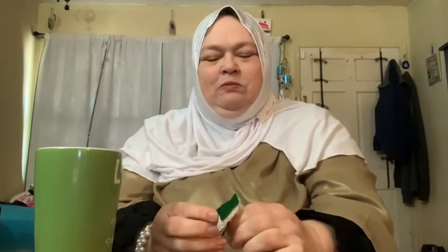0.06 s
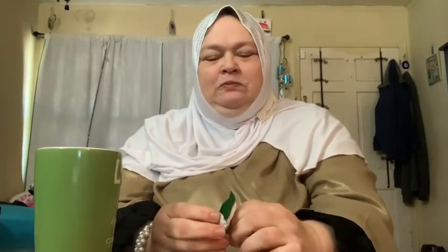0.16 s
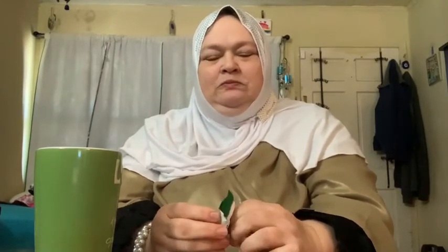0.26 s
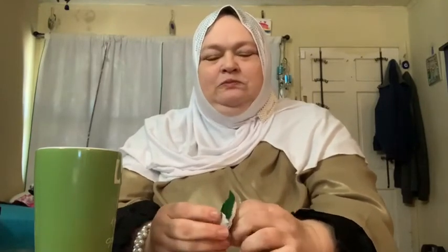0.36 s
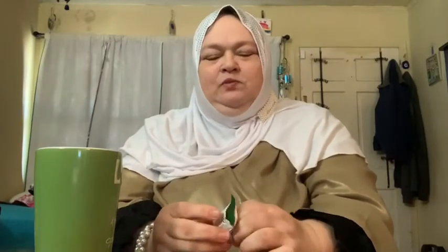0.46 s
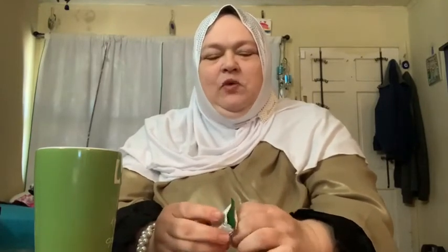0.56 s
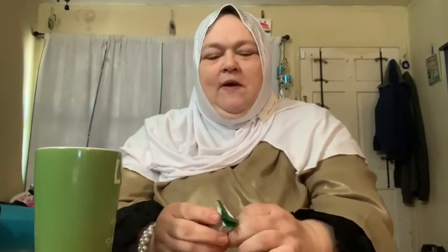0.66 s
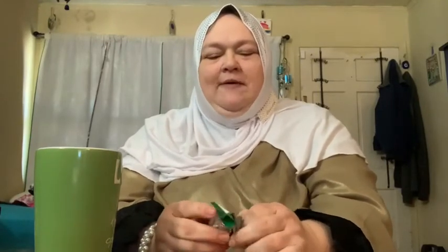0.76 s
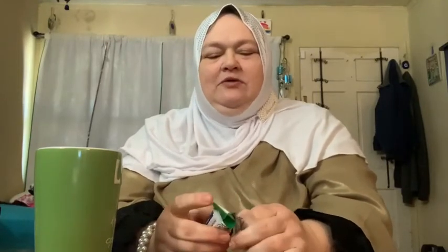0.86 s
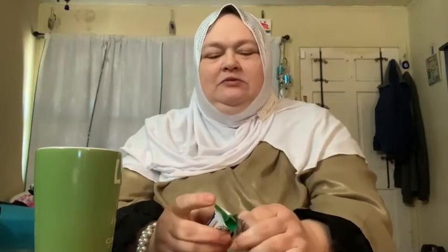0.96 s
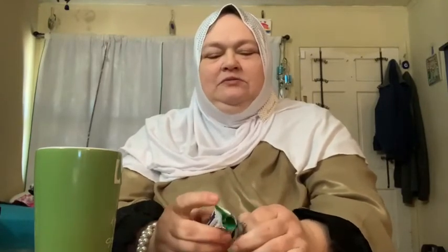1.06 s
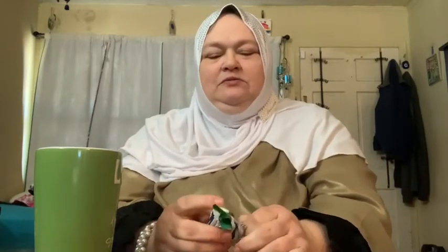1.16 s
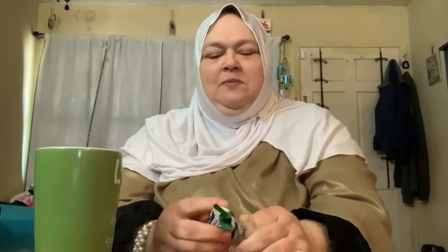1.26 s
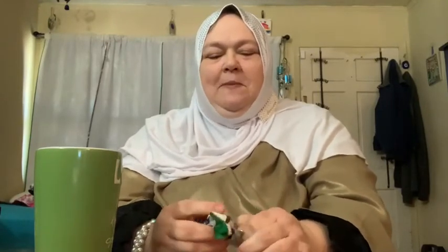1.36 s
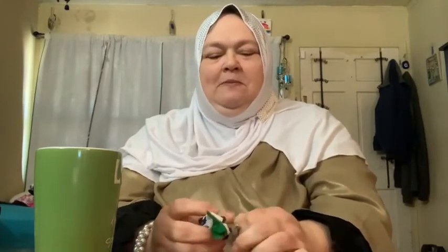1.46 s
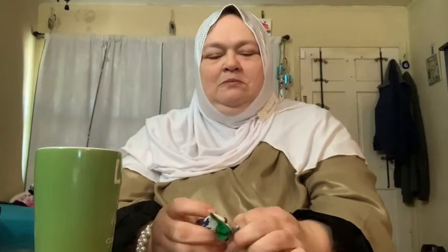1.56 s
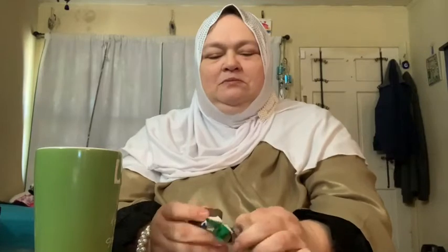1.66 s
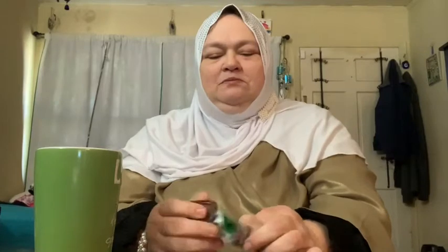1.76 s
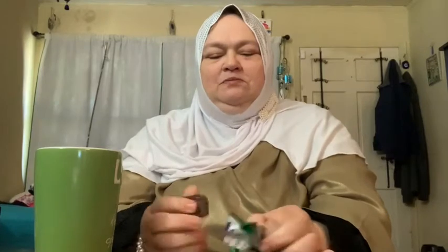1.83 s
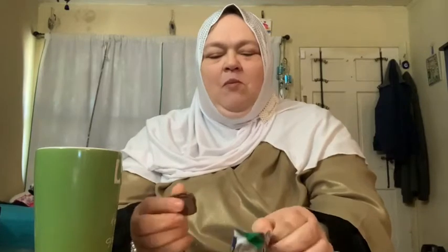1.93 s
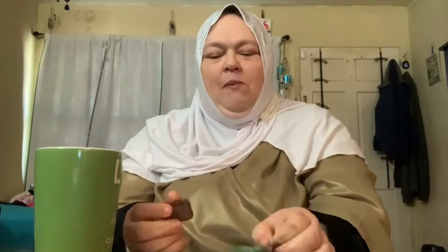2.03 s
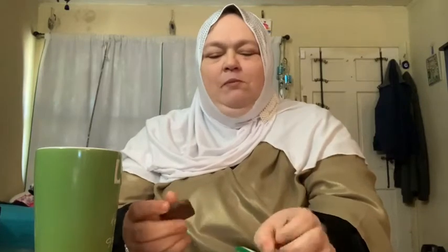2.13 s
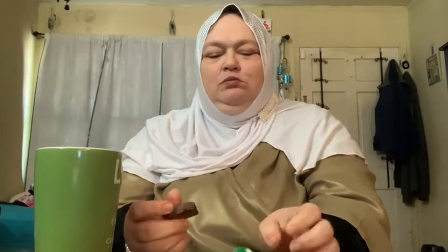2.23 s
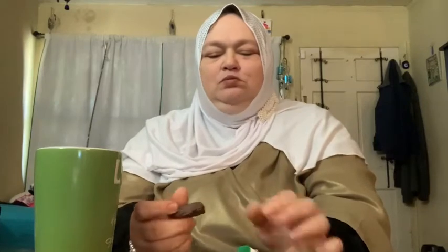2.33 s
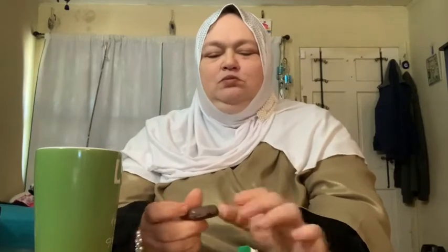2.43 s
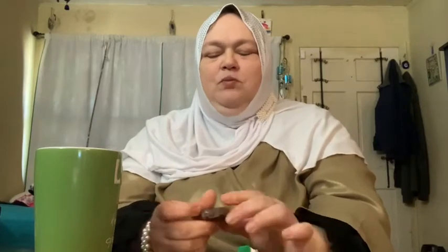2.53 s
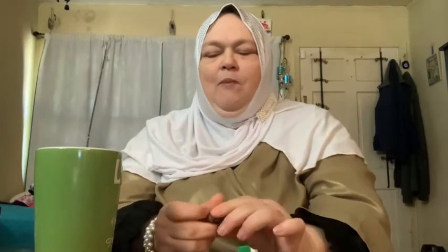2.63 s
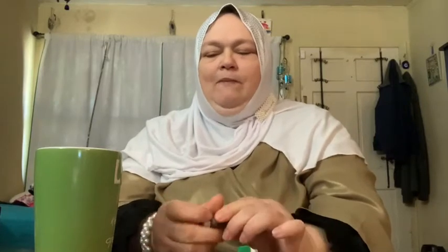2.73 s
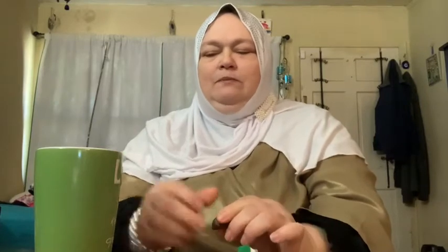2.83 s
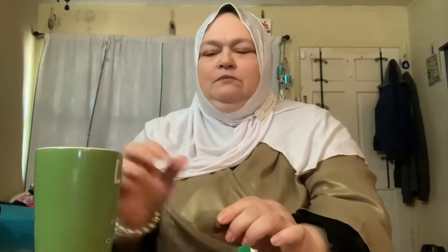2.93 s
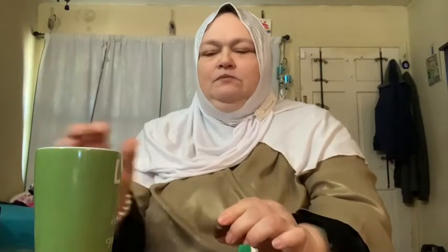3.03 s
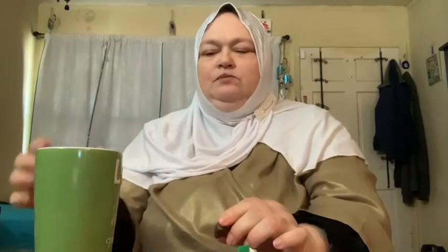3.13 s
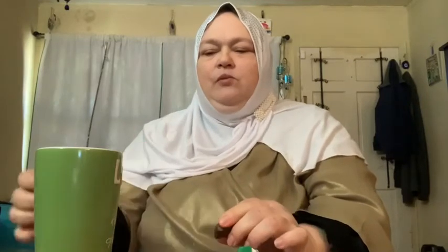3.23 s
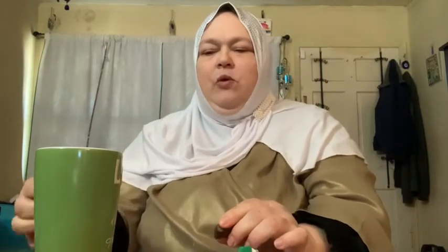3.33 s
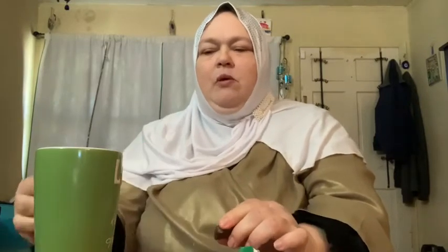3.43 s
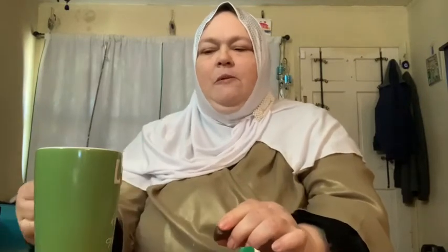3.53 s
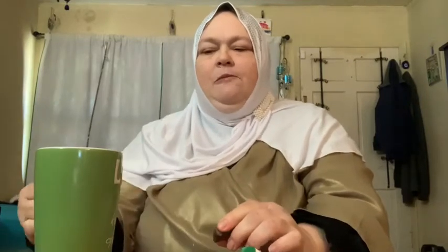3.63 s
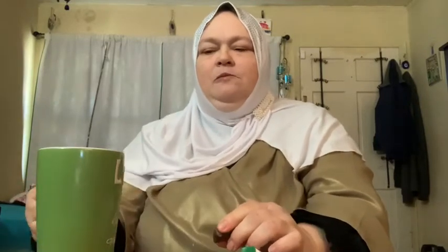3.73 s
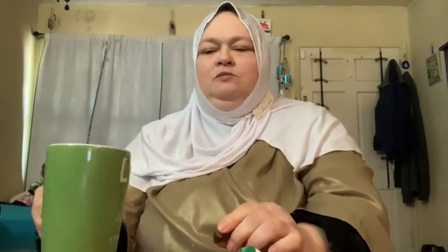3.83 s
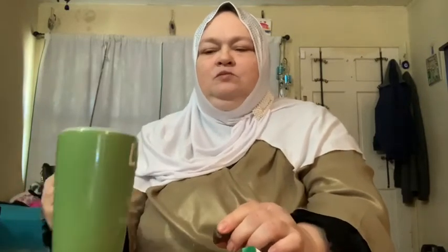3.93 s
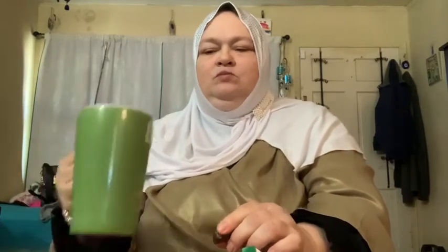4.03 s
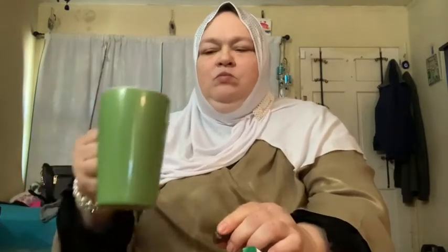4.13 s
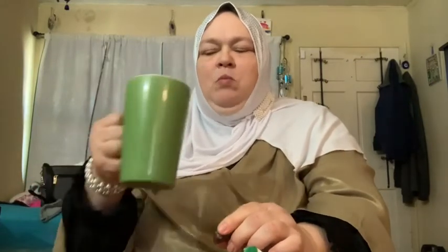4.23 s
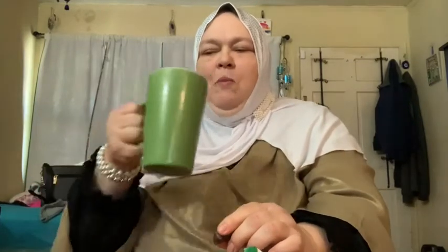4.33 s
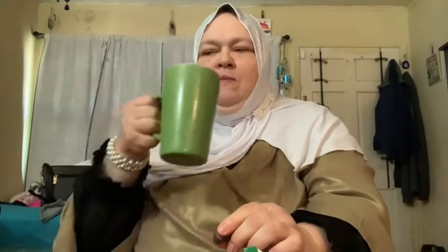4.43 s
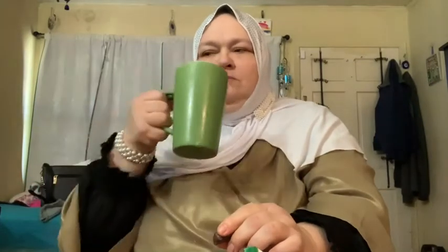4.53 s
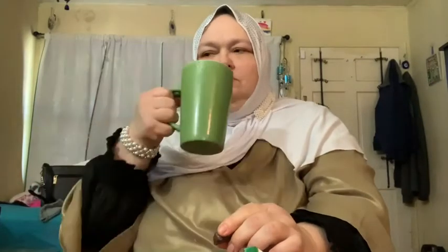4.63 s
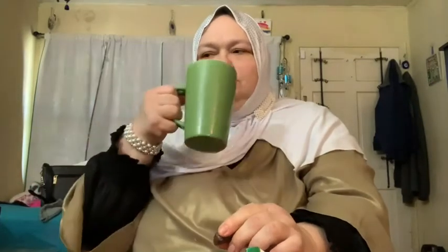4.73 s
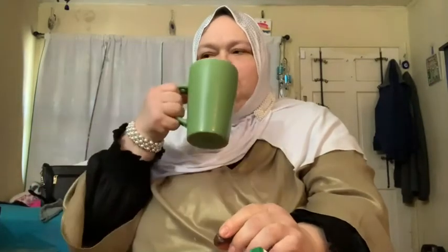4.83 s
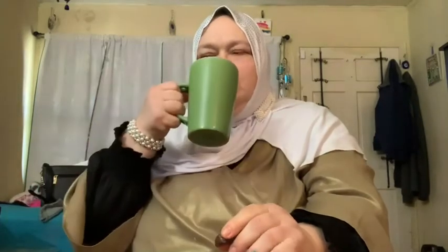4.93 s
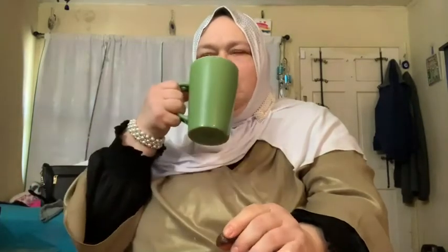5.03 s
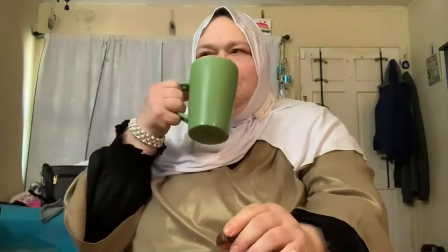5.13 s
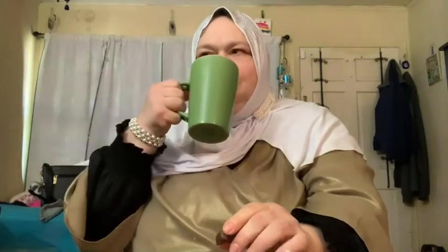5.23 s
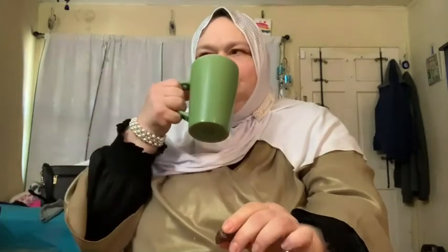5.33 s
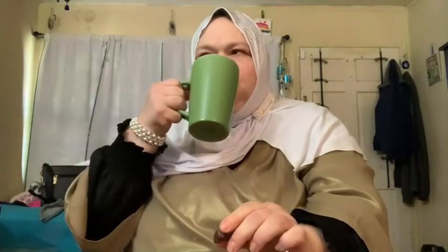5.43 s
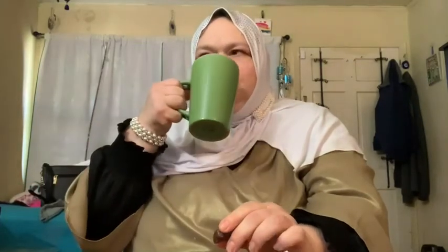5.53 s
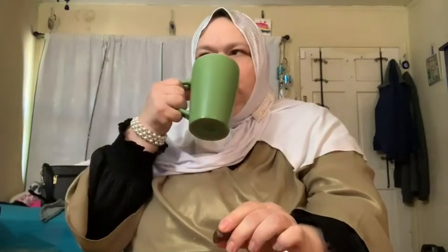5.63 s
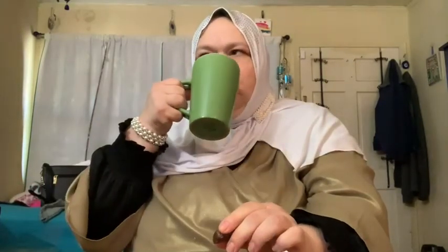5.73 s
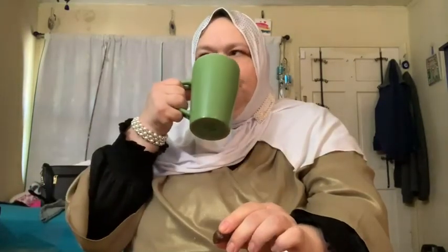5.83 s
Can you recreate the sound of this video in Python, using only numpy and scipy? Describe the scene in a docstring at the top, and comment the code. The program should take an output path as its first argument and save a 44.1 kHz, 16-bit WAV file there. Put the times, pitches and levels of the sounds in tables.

```python
"""Candy wrapper, mug and sip

A stiff plastic candy wrapper is pulled open by hand, close to a two-port microphone in a bedroom: creases
snap (millisecond noise bursts with ringing facets) over a fine crackle (swarms of tiny clicks) that thins
out to a few ticks. A mug is taken from the table with a dull knock (swelling sines) and a short ring; a soft,
fizzy sip follows (clicks again). The room adds early echoes, a short tail, a low rumble and a faint hum."""
import sys
import numpy as np
from scipy import signal
from scipy.fft import rfft, irfft
from scipy.io import wavfile

SR = 44100
rng = np.random.default_rng(int(sys.argv[2]) if len(sys.argv) > 2 else 0)


def store_wav(level_fs):
    """Save 16-bit WAV to argv[1]."""
    pcm = np.round(np.clip(np.atleast_2d(level_fs), -1, 1) * 32767)
    wavfile.write(sys.argv[1], SR, pcm.T.astype(np.int16))


N = 259683

# squeezes or pulls of the fingers on the film: (t/s, hold/s, relative crackle level/dB, hollow share/dB)
SQUEEZES = [(0, 0.0327, -42, -14.5), (.09, 0.1076, -55.5, -19.5), (.21, .14, -50, -13.5),
            (.513, 0.0112, -27, -13.5), (.535, 0.0226, -37.5, -7.5), (.632, 0.0186, -37.5, -9),
            (.78, 0.019, -44.5, -13.5), (.89, 0.0366, -48.5, -20), (.957, 0.0248, -37, -6),
            (1.029, 0.0215, -40, -1), (1.09, 0.054, -50.5, -10.5), (1.258, 0.0344, -42.5, -4.5),
            (1.3, 0.0686, -47.5, -2), (1.412, .12, -48, -7.5), (1.55, 0.033, -35, -6.5),
            (1.65, 0.0567, -41, -4), (1.74, 0.0814, -60, 0.5), (1.98, 0.1238, -53.5, -5),
            (2.165, 0.046, -60, -15)]
# dull knocks on the table: (t/s, f/Hz, peak level/dB, swell time/s)
KNOCKS = [(1.768, 236, -54.5, 0.0098), (1.82, 228, -46.5, 0.01), (2.04, 224, -54.5, 0.0112),
          (2.198, 227.2, -56, 0.0074), (3.6574, 217, -25.5, 0.01164), (3.699, 196.5, -40, 0.0249)]
# span over which a click's level is counted
LEVEL_S = .002


def undb(db):
    """Decibels to gain."""
    return 10 ** (np.asarray(db) / 20)


def unit(x):
    """Scale to rms 1."""
    return x / np.sqrt(np.mean(x ** 2))


def band(x, lo_hz, hi_hz, order=2):
    """Causal band-pass along the last axis."""
    edges_hz = [max(lo_hz, 20), min(hi_hz, .45 * SR)]
    sos = signal.butter(order, edges_hz, "band", fs=SR, output="sos")
    return signal.sosfilt(sos, x)


def colour(x, points):
    """Shape a sound by (f/Hz, level/dB) points, joined on a log frequency axis."""
    hz, db = np.transpose(points)
    f = np.maximum(np.fft.rfftfreq(x.shape[-1], 1 / SR), 1)
    gain = undb(np.interp(np.log(f), np.log(hz), db))
    return irfft(rfft(x) * gain, x.shape[-1])


def add(out, s, sound):
    """Mix a short sound in at time s."""
    i = max(int(s * SR), 0)
    n = max(min(sound.shape[-1], N - i), 0)
    out[:, i:i + n] += sound[..., :n]


def clicks(rows, rise_s, lag_s=.000088, lag_spread_s=.00001):
    """Each row buckles once: a short burst in three registers; a facet of its own size rings in each."""
    # registers of a click: (low edge f/Hz, high edge f/Hz, decay/s, gain/dB,
    #                        ring amplitude of the facet [ratio], part that differs between the ports [ratio])
    registers = [(7360, 15000, 0.00019, 0.06, 0.159, 0.24), (1950, 7310, .00042, 2.5, 0.2, 0.7),
                 (977, 1650, .00055, 1.06, 0.22, 0.16)]
    click_samples = 384
    rows, out = np.asarray(rows), np.zeros((2, N))
    t, f = np.arange(click_samples) / SR, np.fft.rfftfreq(click_samples, 1 / SR)
    chance = rng.standard_normal((len(rows), 3, 3, click_samples))
    facet = rng.random((len(rows), 3, 1, 1))
    lag = lag_s + lag_spread_s * rng.standard_normal((len(rows), 1))
    # the fold gives way gradually, then all at once
    onset = 1 - np.exp(-(t / rise_s) ** 2)
    sound = 0
    for k, (lo, hi, decay, gain_db, ring, apart) in enumerate(registers):
        # the facets radiate unevenly, so each port gets a part of its own
        push = chance[:, k, :1] + apart * chance[:, k, 1:]
        facet_hz = lo * (hi / lo) ** facet[:, k]
        mode = ring * np.sin(2 * np.pi * facet_hz * t) * np.exp(-t / (2 * decay))
        burst = band((push * np.exp(-t / decay) + mode) * onset, lo, hi, order=3)
        energy = np.sum(burst ** 2, axis=(1, 2), keepdims=True)
        rms = np.sqrt(energy / (2 * LEVEL_S * SR))
        sound = sound + burst / rms * undb(rows[:, k + 1] + gain_db)[:, None, None]
    # the left port is the farther one
    delay = np.exp(-2j * np.pi * f * np.maximum(lag, 0))
    sound[:, 0] = irfft(rfft(sound[:, 0]) * delay)
    for s, click in zip(rows[:, 0], sound):
        add(out, s - rise_s, click)
    return out


def crackle(strokes, attack_s, release_s, per_second, scatter_db, middle_db):
    """A swarm of tiny clicks of uneven size; with each stroke it swells, holds and lets go."""
    start, hold, level_db, hollow_db = np.transpose(strokes)[:, :, None]
    count = int(per_second * (start.max() - start.min() + .4))
    chance = rng.random((count, 4))
    first_s = max(start.min() - 4 * attack_s, 0)
    when = first_s + (np.arange(count) + 2 * chance[:, 0]) / per_second
    swell = np.minimum(when - start, 0) / attack_s
    letting_go = np.maximum(when - start - hold, 0) / release_s
    effort = np.exp(swell - letting_go)
    # the strongest stroke of the moment sets level and hollowness
    stroke_db = level_db + 20 * np.log10(effort + 1e-9)
    hollowness = hollow_db[stroke_db.argmax(axis=0), 0]
    # many faint ones, few strong ones
    size = unit(undb(-scatter_db * np.log(.03 + .97 * chance[:, 1])))
    # a denser swarm has weaker clicks
    db = stroke_db.max(axis=0) + 20 * np.log10(size) - 10 * np.log10(per_second * LEVEL_S)
    middle = db + middle_db + 8 * (chance[:, 2] - .5)
    hollow = db + hollowness + 10 * (chance[:, 3] - .5)
    return clicks(np.column_stack([when, db, middle, hollow]), rise_s=.0001)


def wrapper():
    """Strong creases snap through over the crackle of the film under the fingers."""
    # strongest creases: (t/s, relative treble level/dB, relative middle level/dB, relative hollow level/dB)
    snaps = [(.0435, -36.5, -44.5, -62.5), (.0762, -38, -41.5, -57), (.1213, -26.5, -35.5, -55),
             (.1682, -38, -46, -65.5), (.1895, -49.5, -52.5, -48), (.222, -32, -38.5, -51),
             (.2734, -45.5, -39.5, -53), (.3689, -41, -37, -51), (.3829, -20.5, -35, -58.5),
             (.4599, -34.5, -49.5, -69.5), (.4908, -40.5, -52.5, -70), (.5098, -25, -31, -43.5),
             (.5145, -18.5, -28.5, -38), (.5226, -35, -37, -32.5), (.5407, -34, -32.5, -40.5),
             (.5517, -31, -36, -37.5), (.5667, -33, -34.5, -45), (.6056, -38, -41, -46),
             (.6367, -33.5, -40.5, -47), (.6489, -24, -34.5, -40), (.6794, -33.5, -35.5, -55.5),
             (.7637, -36, -49.5, -65), (.7741, -28, -38.5, -48.5), (.781, -29, -28.5, -35.5),
             (.8753, -39, -41, -52.5), (.9011, -31, -37, -47), (.9408, -29.5, -31, -34.5),
             (.9617, -27.5, -30.5, -42.5), (.9737, -22, -31, -44.5), (.9808, -26, -33.5, -43.5),
             (.9876, -26, -39.5, -55), (1.0357, -29.5, -34, -35.5), (1.0481, -21.5, -32, -39),
             (1.0596, -29.5, -42, -44.5), (1.088, -18.5, -29, -29.5), (1.2561, -27, -31.5, -32),
             (1.2772, -28, -35, -37.5), (1.3087, -38.5, -38.5, -39.5), (1.3414, -36, -39, -61),
             (1.352, -42, -38.5, -41), (1.4084, -36, -33, -39), (1.4751, -43, -35, -48),
             (1.5536, -27.5, -28, -49.5), (1.5705, -30, -39.5, -41.5), (1.5868, -29.5, -33, -37.5),
             (1.628, -30, -33, -39), (1.6825, -31, -33, -37.5), (1.7016, -42.5, -41, -36.5),
             (1.7431, -35.5, -45, -59), (1.7785, -52.5, -46, -39), (1.9135, -43, -47, -67.5),
             (1.9776, -44.5, -48, -52), (2.0206, -34.5, -39.5, -43), (2.0321, -51.5, -46, -44),
             (2.0908, -63, -44, -49.5), (2.163, -45.5, -43.5, -44.5), (2.3831, -60, -67, -78.5),
             (2.5525, -39, -42.5, -46.5), (2.6801, -39, -42, -41)]
    # attack and release are time constants of the grip
    film = crackle(SQUEEZES, attack_s=.007, release_s=.013, per_second=220, scatter_db=5.0, middle_db=-3.5)
    return undb(-1.5) * clicks(snaps, rise_s=.0003) + undb(-4.0) * film


def sip():
    """Liquid drawn over the rim fizzes as a dense swarm of clicks; single droplets burst."""
    # bursting droplets: (t/s, relative treble level/dB, relative middle level/dB, relative hollow level/dB)
    pops = [(4.7789, -51.5, -52, -61.5), (4.8715, -49, -55, -45.5), (4.921, -46.5, -53, -59),
            (5.13, -59, -64, -67), (5.2013, -77.5, -66, -62)]
    # pulls of liquid over the rim: (t/s, hold/s, relative level/dB, hollow share/dB)
    draws = [(4.728, 0.0316, -66, -3.5), (4.77, 0.0416, -64.5, 0), (4.853, 0.0248, -57.5, -1),
             (4.91, 0.0178, -61.5, 2.5), (4.95, 0.114, -71, -8.5), (5.095, 0.049, -71.5, -3)]
    # attack and release are time constants of the suction
    fizz = crackle(draws, attack_s=0.0073, release_s=0.0359, per_second=600, scatter_db=3.5, middle_db=3.0)
    return undb(-1) * clicks(pops, rise_s=0.00015) + undb(-2.5) * fizz


def ticks():
    """Small, slow-rising clicks while the mug is fetched and after."""
    # (t/s, relative treble level/dB, relative middle level/dB, relative hollow level/dB)
    small_clicks = [(2.8816, -64.5, -54, -62), (3.0231, -62.5, -54, -60), (3.2166, -58.5, -65, -69.5),
                    (3.243, -70, -61.5, -79.5), (3.3285, -67, -77, -81.5), (3.7874, -61.5, -58.5, -65.5),
                    (3.9397, -50.5, -45.5, -43.5), (4.0558, -67, -64, -76), (4.4186, -74.5, -70, -73.5),
                    (4.645, -75, -64, -62.5), (5.495, -81.5, -75, -70.5)]
    return clicks(small_clicks, rise_s=0.00092)


def mug():
    """The mug, tapped as it is lifted, rings briefly in a few modes, damped by the hand."""
    # modes of the mug: (f/Hz, peak level/dB, t60/s)
    modes = [(1360, -59, 0.172), (3120, -64, 0.144), (4160, -66.5, 0.15), (4485, -66.5, 0.11),
             (5495, -67, 0.092)]
    tap_s = 3.9397
    out, t = np.zeros((2, N)), np.arange(SR // 2) / SR
    for hz, db, t60 in modes:
        add(out, tap_s, undb(db - 60 * t / t60) * np.sin(2 * np.pi * hz * t))
    return out


def knocks():
    """The table top swells for a few cycles and dies away quickly."""
    out, t = np.zeros((2, N)), np.arange(SR // 4) / SR
    for s, hz, db, swell in KNOCKS:
        envelope = (t / swell * np.exp(1 - t / swell)) ** 2.32
        add(out, s, undb(db) * envelope * np.sin(2 * np.pi * hz * t))
    return out


def scuffs(grit_db=4, shared_hz=2500):
    """Short slides: uneven slips, each in one band of noise; the low ones reach both ports alike."""
    # slides and rubs of hands, sleeve and mug: (t/s, length/s, centre f/Hz, width/Hz, rms level/dB)
    slides = [(0.027, 0.8, 49.55, 19.9, -57.5), (0.226, 0.245, 435, 200, -77),
              (1.675, 0.0614, 547, 680, -58.5), (2.162, 0.00508, 2607, 1810, -43.5),
              (2.551, 0.00457, 3926, 1750, -46.5), (2.549, 0.0515, 822, 272, -68.5),
              (2.675, 0.0117, 3470, 2770, -54), (3.02, 0.1695, 2597, 2620, -72),
              (3.095, 0.0382, 5950, 8200, -72), (3.22, 0.047, 3526, 1140, -64),
              (3.301, 0.998, 2758, 3620, -81), (3.578, 0.035, 763, 430, -65.5),
              (3.608, 0.196, 193, 136, -53), (3.636, 0.087, 1304, 1206, -60.5),
              (3.781, 0.047, 2950, 2500, -67.5), (3.934, 0.076, 4190, 1800, -70),
              (4.629, 0.0456, 1396, 2300, -69.5), (4.852, 0.084, 408, 484, -73.5),
              (5.81, 0.068, 2200, 1597, -80)]
    # a brush over the table leads into every knock
    lead_s, brush = .022, (0.057, 540.7, 400, -73)
    brushes = [(knock[0] - lead_s, *brush) for knock in KNOCKS]
    # the fingertips rub dully under every squeeze, a little longer than it holds
    extra_s, rub_hz, rub_width_hz, rub_share_db = 0.037, 483.4, 511, -32.5
    rubs = [(s, hold + extra_s, rub_hz, rub_width_hz, db + rub_share_db) for s, hold, db, _ in SQUEEZES]
    out = np.zeros((2, N))
    for s, length, hz, width, db in slides + brushes + rubs:
        n = int(length * SR)
        noise = rng.standard_normal((3, SR))[:, :n]
        # the level steps at random every 64 samples
        grit = undb(grit_db * np.repeat(rng.standard_normal(SR // 64), 64)[:n])
        slips = (noise[0] + hz / shared_hz * noise[1:]) * grit
        shape = np.sin(np.pi * np.sqrt(np.linspace(0, 1, n)))
        slide = shape * band(slips, hz - width / 2, hz + width / 2, order=3)
        add(out, s, undb(db) * unit(slide))
    return out


def room(dry, wet_db=-4.5, t60_low=0.3377, t60_high=0.14, gap_s=0.00056, echo_db=-16):
    """Mug and table send back early echoes; the walls add a short tail, unrelated at the two ports."""
    t = np.arange(SR // 2) / SR
    noise = rng.standard_normal((2, len(t)))
    low = band(noise, 100.13, 5200, order=1)
    tail = low * 1000 ** (-t / t60_low) + (noise - low) * 1000 ** (-t / t60_high)
    tail = tail * (1 - np.exp(-(t / gap_s) ** 2))
    # (f/Hz, level/dB)
    tail_tone = [(200, 0.5), (600, 1.5), (1300, -6), (2400, 2), (4000, -2.5), (9000, -1.5), (15000, -2.5)]
    response = undb(wet_db) * colour(unit(tail) / np.sqrt(len(t)), tail_tone)
    for echo_s in (.0013, .0034, .0086):
        response[:, int(echo_s * SR)] += undb(echo_db)
    return dry + signal.fftconvolve(dry, response, axes=-1)[:, :N]


def room_tone(level_db=-59, shared_hz=450, hum_hz=140):
    """A low rumble common to both ports, a faint hum that sinks away, a thin hiss of each port's own."""
    # spectrum of the still room: (f/Hz, relative level/dB)
    spectrum = [(20, -27), (32, -24), (45, 6.5), (60, -3), (85, -7), (128, -8), (160, -20), (210, -19),
                (280, -31), (700, -36), (2100, -40), (7500, -52), (13000, -46.5), (16000, -58.5)]
    # hum: (t/s, peak level/dB)
    hum_level = [(0, -66), (2.2, -64.5), (2.6, -76.5), (5.9, -80.5)]
    t, f = np.arange(N) / SR, np.fft.rfftfreq(N, 1 / SR)
    common, own = rng.standard_normal(N), rng.standard_normal((2, N))
    apart = f / (f + shared_hz)
    air = irfft(rfft(common) * np.sqrt(1 - apart ** 2) + rfft(own) * apart, N)
    # level interpolated in decibels, then turned into gain
    hum_s, hum_db = np.transpose(hum_level)
    hum = undb(np.interp(t, hum_s, hum_db)) * np.sin(2 * np.pi * hum_hz * t)
    return undb(level_db) * unit(colour(air, spectrum)) + hum


def scene():
    """Wrapper, mug and sip in the room; the knocks come straight through the table."""
    handling = ticks() + scuffs() + mug()
    return room(wrapper() + sip() + handling) + knocks() + room_tone()


def record(dry):
    """The microphone's colour, then a steep low-pass."""
    # (f/Hz, level/dB)
    tone = [(100, 0), (400, 3.5), (700, -1.5), (1200, -0.5), (1900, -1.25), (2700, -4.5), (4100, 1.1),
            (5200, -0.6), (6400, 3.0), (8000, 1.49), (9500, 0.7), (11000, 1.93), (14000, 1), (16000, -13.0)]
    top_hz = 16300
    low_pass = signal.ellip(8, .2, 70, top_hz, fs=SR, output="sos")
    return signal.sosfilt(low_pass, colour(dry, tone))


dry = scene()
out = record(dry)
store_wav(out)
```